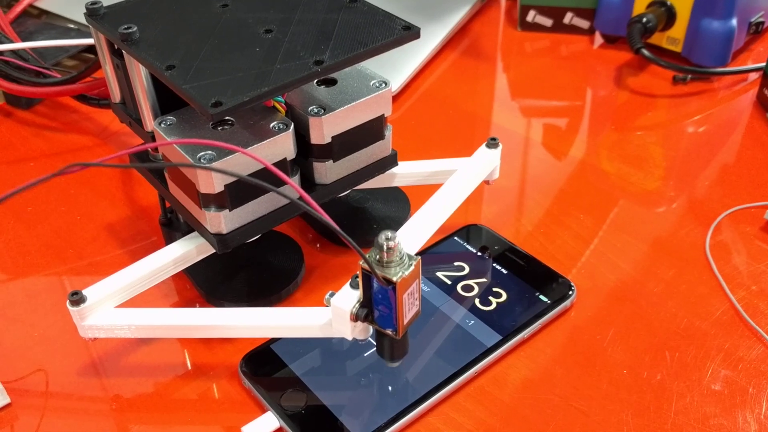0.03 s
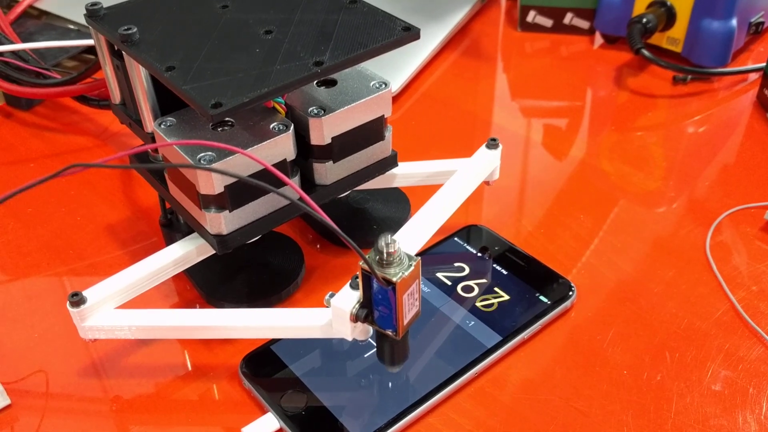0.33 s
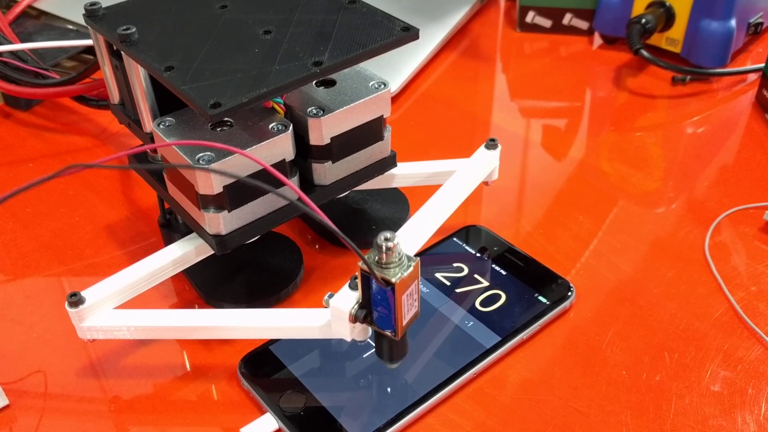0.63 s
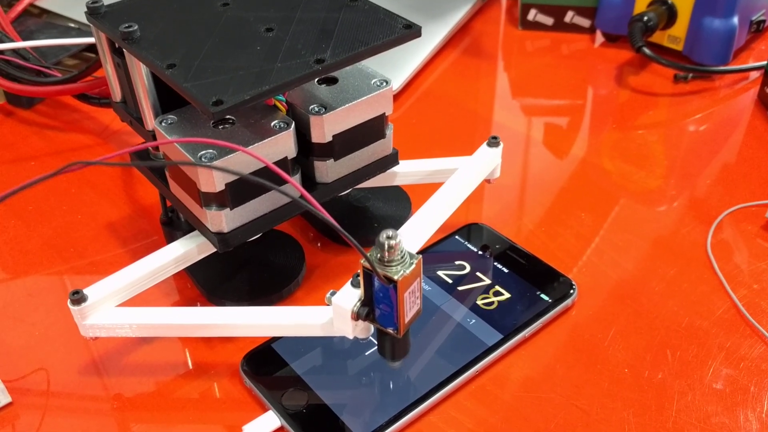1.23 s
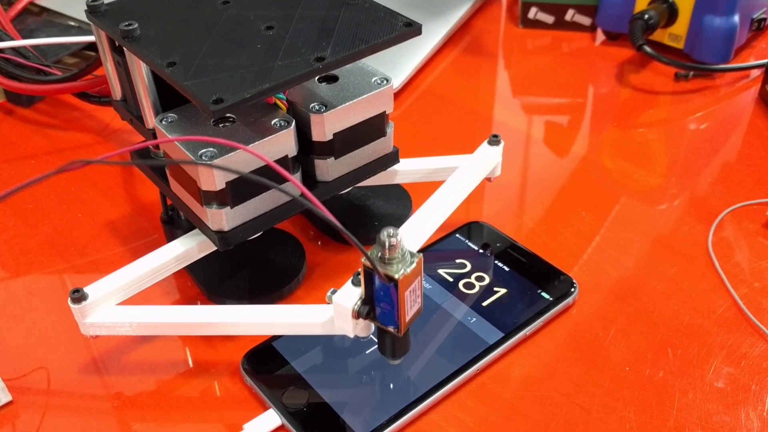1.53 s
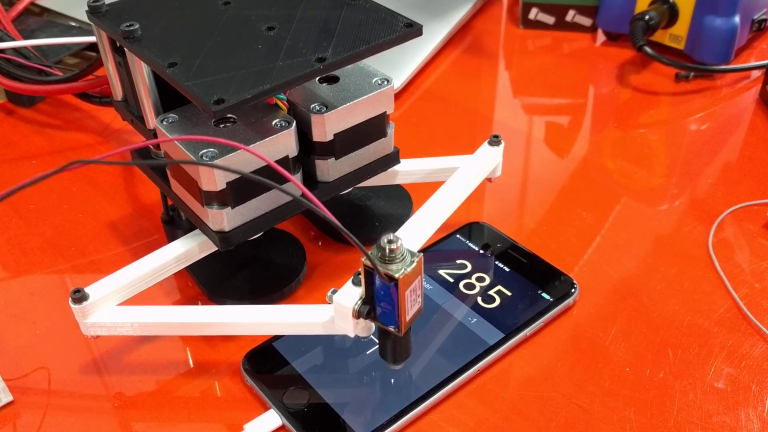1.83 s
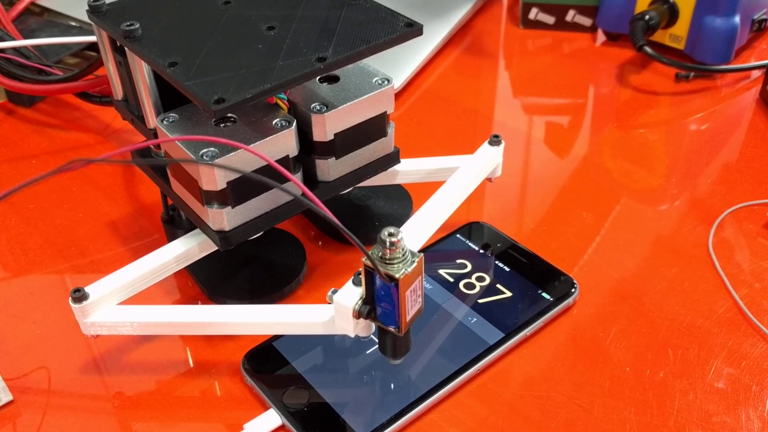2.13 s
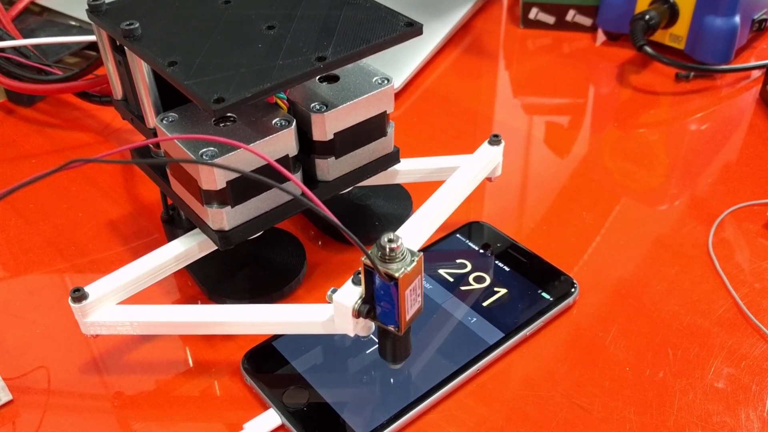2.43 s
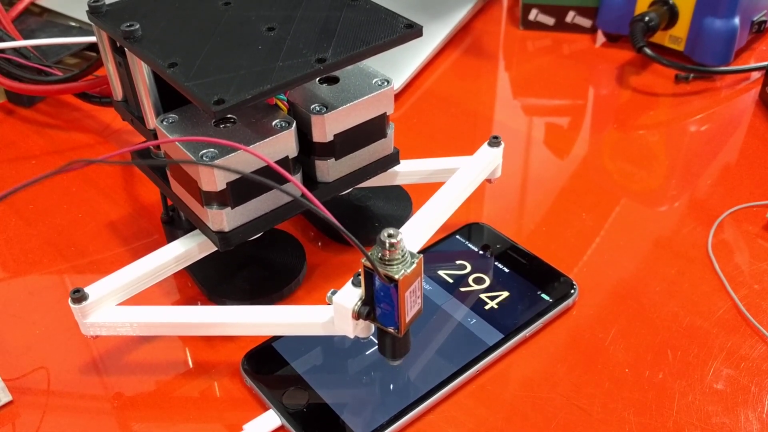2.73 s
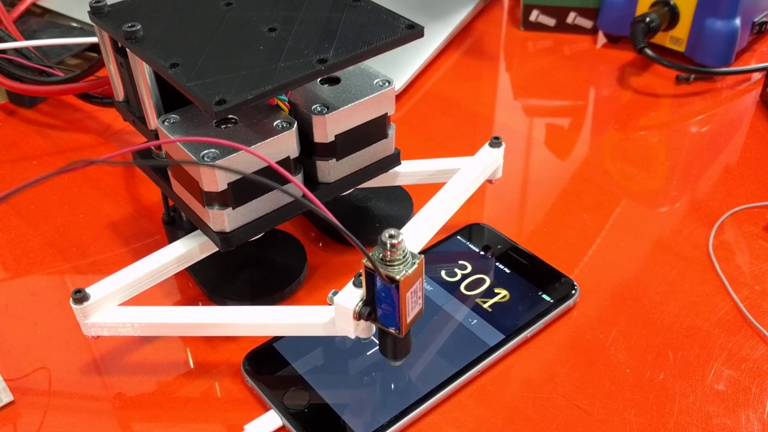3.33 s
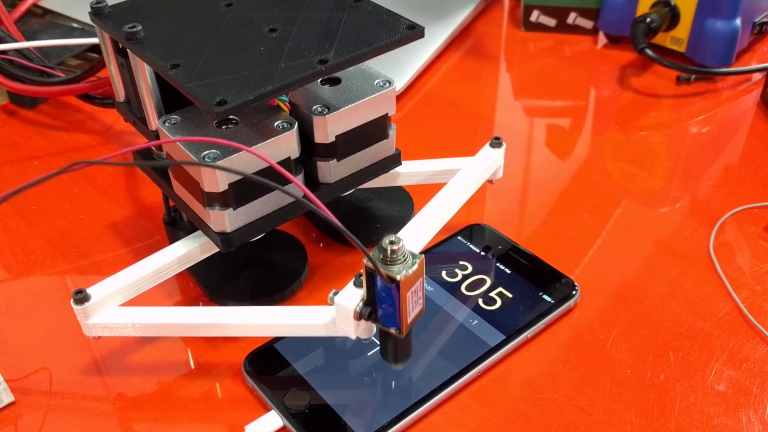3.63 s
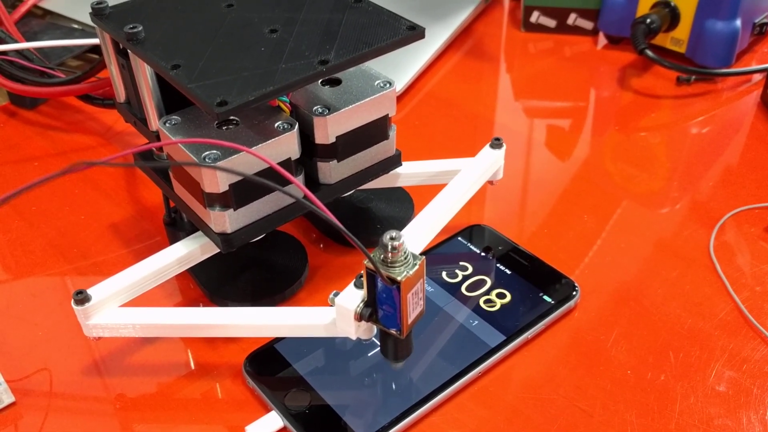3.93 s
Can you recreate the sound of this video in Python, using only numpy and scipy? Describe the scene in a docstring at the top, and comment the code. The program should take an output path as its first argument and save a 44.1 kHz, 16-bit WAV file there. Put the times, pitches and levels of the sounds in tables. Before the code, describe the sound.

A robot's solenoid taps a phone screen with rapid, regular, sharp metallic clicks.

```python
"""Solenoid tapping a phone screen

A table in a small room, one microphone close to a robot arm whose solenoid taps about twelve times a
second. Each stroke is a sharp metal click with a rebound, a brief hollow ring of the mount, faint ticks
from the joints and a soft thump of the tip on the phone. The room answers over a low, steady rumble."""
import sys
import numpy as np
from scipy import signal
from scipy.fft import rfft, irfft
from scipy.io import wavfile
from scipy.ndimage import map_coordinates

SR = 44100
rng = np.random.default_rng(int(sys.argv[2]) if len(sys.argv) > 2 else 0)


def master_out(mix):
    """Clip the mix to full scale and print it as 16-bit PCM to the path in sys.argv[1]."""
    frames = np.transpose(np.atleast_2d(mix))
    ceiling = np.clip(frames, -1, 1)
    pcm = np.round(ceiling * 32767).astype(np.int16)
    wavfile.write(sys.argv[1], SR, pcm)


N = 176400
T = np.arange(SR * 2 // 5) / SR  # time axis of one ring or tail, in seconds

# Solenoid strokes: start_s, click_db, flight_s, rebound_db, knock_db, clink_db
# The rebound is relative to the click; rebound and knock are trimmed where they are played.
STROKES = [(0.0262, -18, 0.0151, -11, -59, 5.5), (0.106, -17.0, 0.0175, -12, -46, 2.5),
           (0.1911, -19, 0.0157, -8.5, -65, 1.5), (0.2723, -16.5, 0.0158, -13, -41, 4.5),
           (0.363, -18.5, 0.017, -11.5, -52, 2.5), (0.4471, -19.5, 0.015, -8.5, -65, 1),
           (0.5337, -18.8, 0.016, -11, -63, 0), (0.6135, -17.5, 0.016, -13.5, -41.5, 3.5),
           (0.7028, -17.0, 0.015, -12.5, -40.5, 4), (0.7819, -21, 0.014, -10.0, -65, -1),
           (0.868, -20, 0.0146, -8, -69, 2), (0.9483, -17.5, 0.0159, -12.0, -44.5, 5),
           (1.0304, -20, 0.013, -11, -60.0, 0), (1.1109, -19, 0.017, -9.5, -53, 3.5),
           (1.1944, -17.5, 0.018, -12, -47, 2.5), (1.2832, -17.5, 0.015, -12, -45, 2),
           (1.3575, -16, 0.011, -18.0, -44.5, 6), (1.4393, -17.5, 0.0174, -11, -46, 2.5),
           (1.5234, -20.5, 0.015, -8, -74, 1.5), (1.6062, -20.5, 0.014, -8, -73, 0),
           (1.6869, -22, 0.011, -6.5, -67, 0.5), (1.77, -21.5, 0.012, -6.5, -67, -3),
           (1.8492, -18, 0.0168, -9.5, -50.0, 3.5), (1.9373, -17, 0.018, -12, -51, 2.5),
           (2.0237, -17.5, 0.012, -17, -44, 0), (2.111, -19, 0.017, -9, -69, 3),
           (2.196, -19.5, 0.013, -9, -66, -0.5), (2.2811, -19, 0.016, -10, -59, 3),
           (2.367, -19, 0.0148, -12, -65, 2), (2.4531, -19.5, 0.015, -8.5, -67, 3),
           (2.5393, -19.5, 0.015, -9.0, -69, 2), (2.6244, -19.5, 0.015, -8.5, -65, 0),
           (2.7102, -20, 0.0146, -12.5, -57, 3), (2.7949, -19.6, 0.014, -9.5, -57, 0.5),
           (2.8796, -20, 0.015, -8.0, -71, 2), (2.9648, -20, 0.015, -8.5, -68, 3),
           (3.0497, -19, 0.015, -10.5, -68, 0), (3.1352, -20, 0.015, -8, -53.0, 3),
           (3.2177, -20.5, 0.012, -7, -64, 0.5), (3.302, -20.5, 0.013, -9, -70, 2),
           (3.385, -20, 0.014, -6, -63, 1), (3.4713, -19, 0.015, -12, -65, 0),
           (3.5567, -19.5, 0.014, -7, -65, -3), (3.6421, -20, 0.013, -7, -53, 1),
           (3.7268, -20.5, 0.014, -7, -67, 1), (3.8118, -20, 0.014, -7.5, -67, 0.5),
           (3.8942, -20.5, 0.013, -7, -71, 1), (3.9789, -19.5, 0.014, -9, -58, 3)]
# Loose rattles of the plunger: start_s, level_db
RATTLES = [(0.7515, -44), (1.2284, -41), (1.379, -39), (1.3834, -38), (1.398, -42), (1.402, -35),
           (1.648, -38), (1.7255, -45), (2.5774, -44), (3.2507, -42)]
CLINK_HZ, RATTLE_HZ = 2421, 5400  # resonances favoured by a full stroke and by a loose contact


def amp(db):
    """Decibels to gain."""
    return 10 ** (np.asarray(db) / 20)


def unit(x):
    """Scale to energy 1."""
    return x / np.sqrt(np.sum(x ** 2) + 1e-20)


def along(points, hz):
    """Read (Hz, value) points on a log frequency axis."""
    point_hz, values = np.transpose(points)
    return np.interp(np.log(hz + 1), np.log(point_hz + 1), values)


def gain_at(points, seconds):
    """Read (s, dB) points as a gain."""
    return amp(np.interp(seconds, *np.transpose(points)))


def fade(t60):
    """Exponential decay, 60 dB down after t60 seconds."""
    return amp(-60 * T / t60)


def rise(seconds):
    """Soft attack."""
    return 1 - np.exp(-T / seconds)


def add(track, start_s, sound):
    """Mix a sound into the track."""
    start = max(0, round(start_s * SR))
    part = track[start:start + len(sound)]
    part += sound[:len(part)]


def noise(spectrum, size):
    """Coloured noise of energy 1."""
    colour = amp(along(spectrum, np.fft.rfftfreq(size, 1 / SR)))
    return unit(irfft(rfft(rng.standard_normal(size)) * colour, size))


def blow(db):
    """Gain that gives a sound of energy 1 the energy of 200 samples at this level."""
    return amp(db) * np.sqrt(200)


def struck(modes, boost_db=0, boost_hz=CLINK_HZ):
    """Heavily damped resonances, a little different at every blow, optionally stressed in one band."""
    pitch_hz, width_hz, level_db = np.transpose(modes)[:, :, None]
    hz = np.fft.rfftfreq(2048, 1 / SR)
    heights = amp(level_db + 1.24 * rng.standard_normal(level_db.shape))
    peaks = heights / (1 + (2 * (hz - pitch_hz) / width_hz) ** 2)
    boost = amp(boost_db * np.exp(-((hz - boost_hz) / 520) ** 2))
    spectrum = np.linalg.norm(peaks, axis=0) * boost
    # Minimum phase packs the energy at the start, as in an impact.
    cepstrum = irfft(np.log(spectrum + 1e-6))
    cepstrum[1:len(hz) - 1] *= 2
    cepstrum[len(hz):] = 0
    return unit(irfft(np.exp(rfft(cepstrum))))


def ring(modes, scatter_db, detune):
    """Longer ringing modes with chance in level and pitch."""
    out = np.zeros(len(T))
    for hz, db, t60 in modes:
        gain = amp(db + scatter_db * rng.normal())
        pitch_hz = hz * (1 + detune * rng.normal())
        out += gain * fade(t60) * np.sin(2 * np.pi * pitch_hz * T)
    return out


def room_tone():
    """Low room rumble with a faint hiss; a weak hum swells and fades in the first second."""
    # Colour of the rumble and hiss: frequency_hz, relative_db
    air_spectrum = [(15, -45), (28, -31), (42, -12), (58, 2), (75, -6), (95, -8.5), (165, -9.5), (230, -15),
                    (400, -22), (590, -20.5), (750, -24), (1500, -27), (4000, -29.5), (9000, -31.5),
                    (16000, -26.5)]
    # Their slow drift: time_s, level_db
    air_level = [(0, -44), (.8, -45.5), (1.25, -45.5), (1.9, -45.5), (3, -46.5), (4, -47)]
    # Swell of the hum: time_s, level_db
    hum_level = [(0, -64), (.25, -53.5), (.65, -50), (.95, -65.5)]
    hum_hz = 151.5
    t = np.arange(N) / SR
    air = gain_at(air_level, t) * np.sqrt(N) * noise(air_spectrum, N)
    hum = gain_at(hum_level, t) * np.sin(2 * np.pi * hum_hz * t)
    return air + hum


def plunger():
    """The plunger hits its stop, rebounds, settles and rattles; each contact rings frame and room."""
    # Resonances of the plunger and steel frame: pitch_hz, width_hz, relative_db
    steel_modes = [(1743, 296, -13.5), (2391, 198, -8.5), (2816, 327, -9), (3422, 105, -13.5),
                   (3810, 430, -12.5), (4157, 145, -10), (5220, 710, -12), (5757, 610, -4),
                   (6400, 460, -7.5), (6928, 280, 2.5), (7480, 62, -8.5), (7750, 300, -7.5),
                   (8390, 190, -8.5), (8750, 340, -3.5), (9660, 710, -8.5), (10370, 360, -13.5),
                   (11066, 330, -2), (11990, 270, -2), (12610, 520, -1.5), (12940, 490, 1),
                   (13500, 320, -9.5), (14000, 380, -9.5), (15720, 570, -4)]
    room_db = -15.5
    room_fresh, clatter_fresh = 0.25, 0.7  # shares of energy drawn anew per stroke and per contact
    out = np.zeros(N)
    room = amp(room_db) * np.sqrt(1 - room_fresh) * room_tail()
    path = frame_path()
    common_clatter = np.sqrt(1 - clatter_fresh) * frame_clatter()
    contacts = [(start_s, db, 7, RATTLE_HZ) for start_s, db in RATTLES]
    for start_s, db, flight_s, rebound_db, _, clink_db in STROKES:
        hit = (start_s, db, clink_db, CLINK_HZ)
        rebound = (start_s + flight_s, db + rebound_db - 2, 3, RATTLE_HZ)
        settle = (start_s + 2.4 * flight_s, db - 28 + 2 * rng.normal(), 7, RATTLE_HZ)
        contacts += [hit, rebound, settle]
        add(out, start_s, blow(db + room_db) * np.sqrt(room_fresh) * room_tail())
    for start_s, db, boost_db, boost_hz in contacts:
        click = signal.fftconvolve(struck(steel_modes, boost_db, boost_hz), path)
        clatter = common_clatter + np.sqrt(clatter_fresh) * frame_clatter()
        for sound in (click, clatter, room):
            add(out, start_s, blow(db) * sound)
    return out


def frame_path():
    """Bending waves cross the frame: each frequency has its own small delay, the low ones the longest."""
    bend_s, smear_s = 0.0008, 0.00065  # bending delay at CLINK_HZ; scale of the random extra delay
    hz = np.fft.rfftfreq(2048, 1 / SR)
    spread = np.abs(map_coordinates(rng.standard_normal(40), [hz / 600]))
    delay_s = bend_s * 2 / (1 + (hz / CLINK_HZ) ** 2) + smear_s * spread
    phase = -2 * np.pi * np.cumsum(delay_s) * hz[1]
    return irfft(np.exp(1j * phase))[:len(hz)]


def frame_clatter():
    """The frame scatters a contact into a short diffuse clatter."""
    # Colour of the clatter: frequency_hz, relative_db
    spectrum = [(200, -25), (700, -22), (1200, -5), (1800, -4.5), (2600, -2.5), (3200, -2.5), (4600, -5),
                (5700, 1), (6900, -0.5), (9000, -1.5), (12800, 0), (15500, 1)]
    size = SR // 16
    envelope = fade(t60=0.026) * rise(seconds=0.0012)
    return amp(-7) * unit(noise(spectrum, size) * envelope[:size])


def room_tail():
    """The small room answers with a diffuse tail in which each frequency dies at its own speed."""
    # Colour of the sound scattered by the room: frequency_hz, relative_db
    spectrum = [(200, -27), (700, -7.5), (1100, 0), (1400, 0.5), (2000, -3), (3100, 0.5), (3500, -1.5),
                (4600, -6), (5700, -1), (6400, -2.5), (6950, 3.5), (7500, -3), (9400, -1.5), (11000, 2),
                (11700, -2.5), (12700, 7.5), (14200, -3.5), (15600, -15.5)]
    # Reverberation time: frequency_hz, t60_s
    decay_times = [(300, 0.31), (2000, 0.17), (7000, 0.24), (15000, 0.19)]
    hz, t, bands = signal.stft(noise(spectrum, len(T)), SR, nperseg=256)
    decay = amp(-60 * t / along(decay_times, hz)[:, None])
    _, tail = signal.istft(bands * decay, SR, nperseg=256)
    return unit(tail[:len(T)] * rise(seconds=0.022))


def arm():
    """Strokes knock through the arm; stroke, rebound, lift-off and rattles each jolt the mount."""
    # Dull knock of the arm: pitch_hz, width_hz, relative_db
    arm_modes = [(257, 420, -6.5), (630, 750, -4), (1560, 75, 2)]
    mount_delay_s = 0.0045
    out = np.zeros(N)
    for start_s, db, flight_s, rebound_db, knock_db, _ in STROKES:
        add(out, start_s, blow(knock_db + 3) * struck(arm_modes))
        hollow = mount_ring(db)
        rebound = (flight_s, rebound_db - 3)
        lift_off = (0.04 + 0.0022 * rng.normal(), -11.5 + 3 * rng.normal())
        # The same ring three times over, adding up or cancelling.
        for later_s, jolt_db in [(0, 0), rebound, lift_off]:
            add(out, start_s + mount_delay_s + later_s, amp(jolt_db) * hollow)
    for start_s, db in RATTLES:
        add(out, start_s + mount_delay_s, amp(-9) * mount_ring(db))
    return out


def mount_ring(contact_db):
    """The mount rings hollow, a little louder after a harder contact."""
    # Modes of the mount, with faint metal overtones: pitch_hz, relative_db, t60_s
    mount_modes = [(866, -15, 0.1), (1097, -2.5, 0.14), (1124, -3.5, 0.093), (1657, -14.5, 0.15),
                   (1865, -9.5, 0.06), (2130, -25, 0.18), (3350, -26, 0.38), (3620, -21.5, 0.34),
                   (6870, -21, 0.15), (6870, -18, 0.21)]
    follows = 0.31  # dB of ring for each dB of contact
    envelope = amp(-27 + follows * contact_db) * rise(seconds=0.0062)
    return envelope * ring(mount_modes, scatter_db=0.5, detune=0.008)


def joints():
    """The loose joints of the arm rustle with faint ticks while it shakes after each stroke."""
    # Resonances of the play in the joints: pitch_hz, width_hz, relative_db
    joint_modes = [(1430, 110, -1), (1665, 70, 1.5), (1964, 250, -1.5), (3450, 270, -6.5)]
    # Delay of the ticks after a stroke: earliest_s, median_s, latest_s
    tick_window = (0.014, .041, .055)
    tick_db, spread_db = -56, 3.5
    out = np.zeros(N)
    for start_s, *_ in STROKES:
        for share in rng.random(size=10):
            tick = struck(joint_modes)
            later_s = np.interp(share, [0, 0.5, 1], tick_window)
            add(out, start_s + later_s, blow(tick_db + spread_db * rng.normal()) * tick)
    return out


def tip():
    """The soft tip thumps the phone and the table once in each cycle."""
    # Modes of the phone and table: pitch_hz, relative_db, t60_s
    table_modes = [(61.7, 9.5, 0.11), (129, -2.5, 0.19), (174.2, -7, 0.14), (252, -1.5, 0.055)]
    # Force of the tip: time_s, gain_db
    thump_level = [(0, -44.5), (.8, -44.5), (1.1, -40), (1.35, -43.5), (1.8, -45), (2.6, -45), (4, -44.5)]
    delay_s = 0.031
    out = np.zeros(N)
    for start_s, *_ in STROKES:
        thump = rise(seconds=0.0014) * ring(table_modes, scatter_db=1, detune=0.012)
        add(out, start_s + delay_s, gain_at(thump_level, start_s) * thump)
    return out


def scene():
    """The arm, the table and the room at one close microphone."""
    return (plunger() + arm() + joints() + tip() + room_tone())[None]


def record(dry):
    """The recorder drops the deepest bass and cuts off the top of the treble steeply."""
    low_cut_hz, top_hz = 31.5, 15900
    low_cut = signal.butter(4, low_cut_hz, "hp", fs=SR, output="sos")
    spectrum = rfft(signal.sosfilt(low_cut, dry), 2 * N)
    hz = np.fft.rfftfreq(2 * N, 1 / SR)
    high_cut = 1 / np.sqrt(1 + (hz / top_hz) ** 100)
    return irfft(spectrum * high_cut, 2 * N)[:, :N]


dry = scene()
out = record(dry)
master_out(out)
```